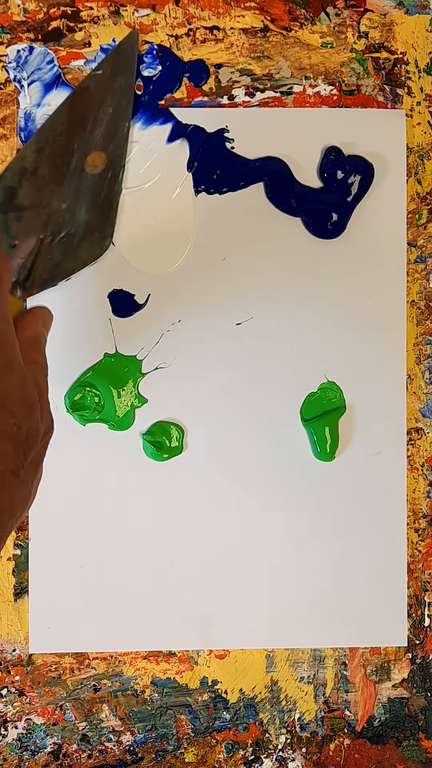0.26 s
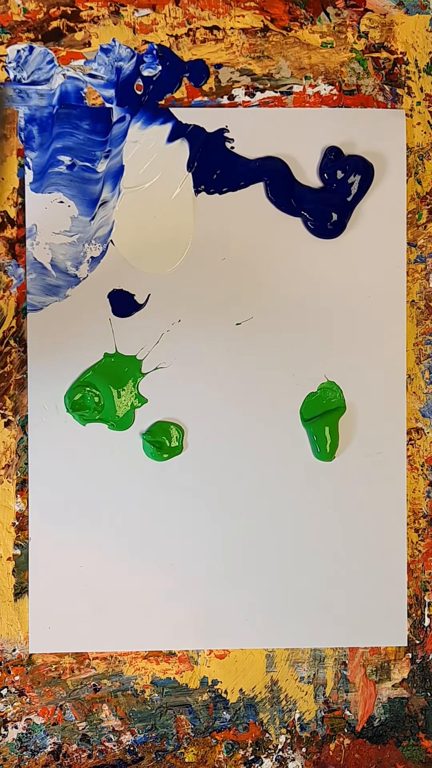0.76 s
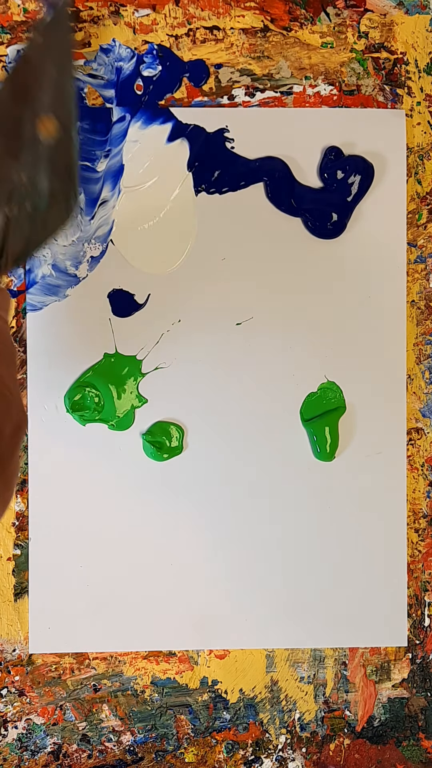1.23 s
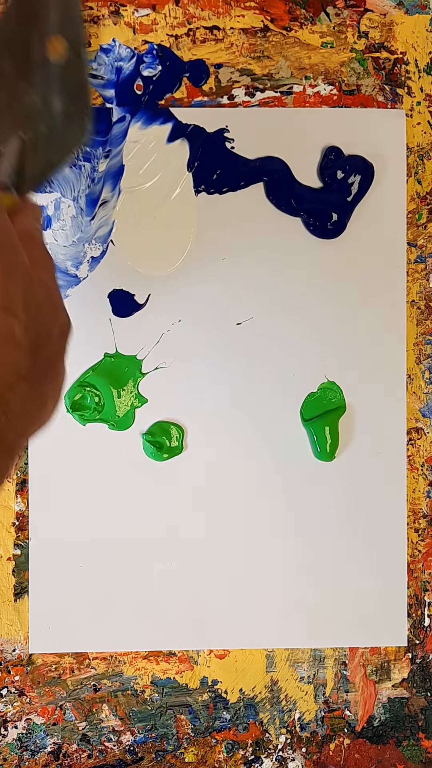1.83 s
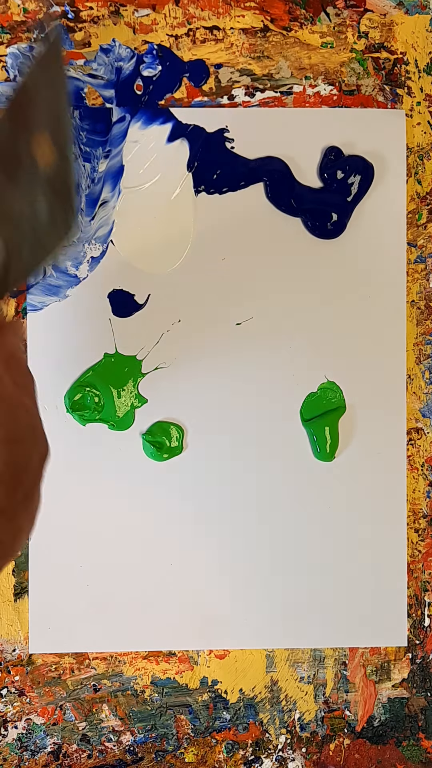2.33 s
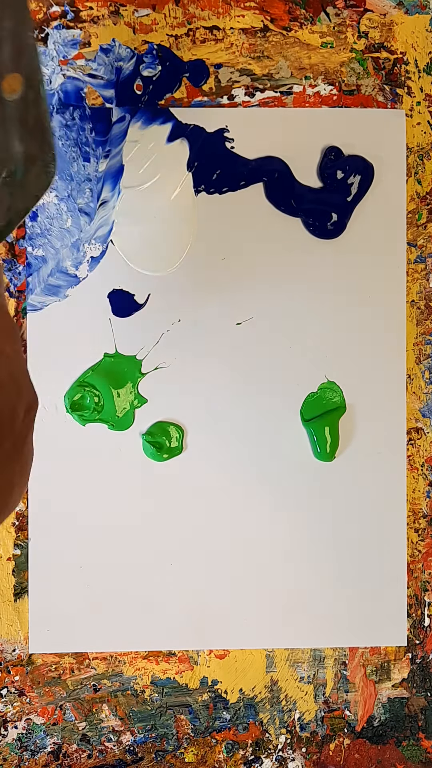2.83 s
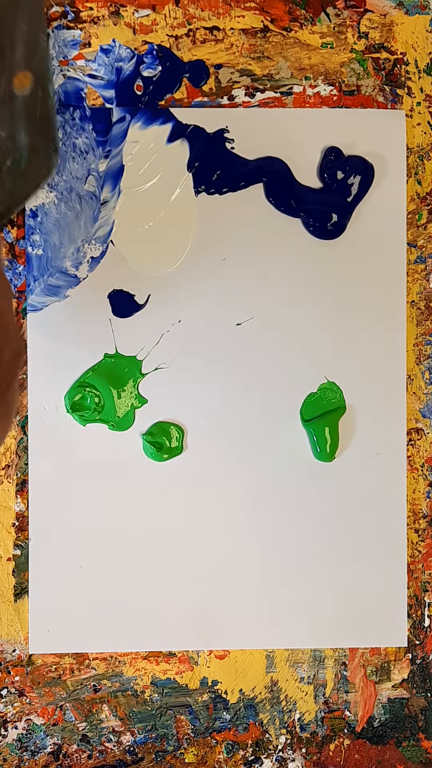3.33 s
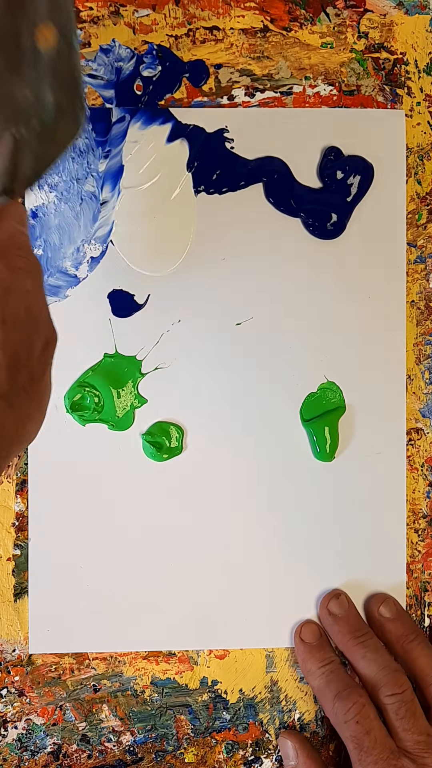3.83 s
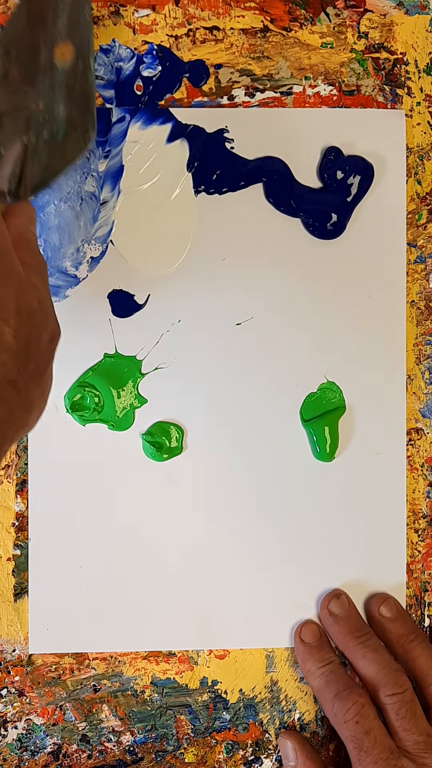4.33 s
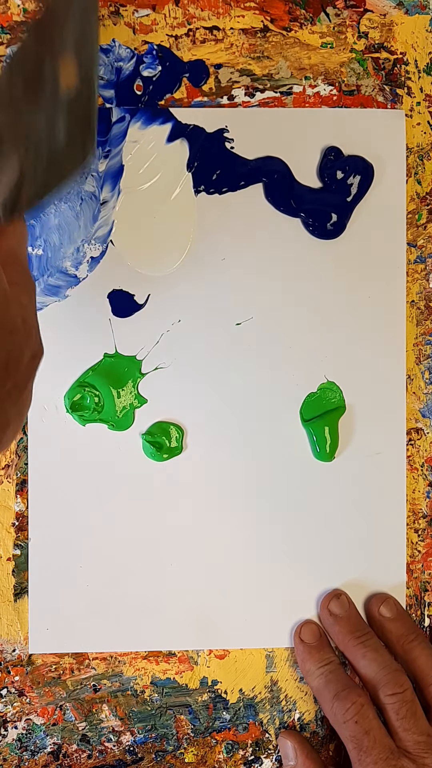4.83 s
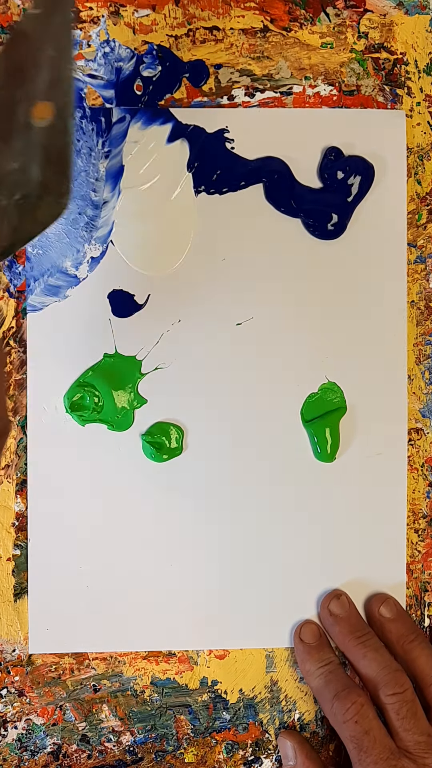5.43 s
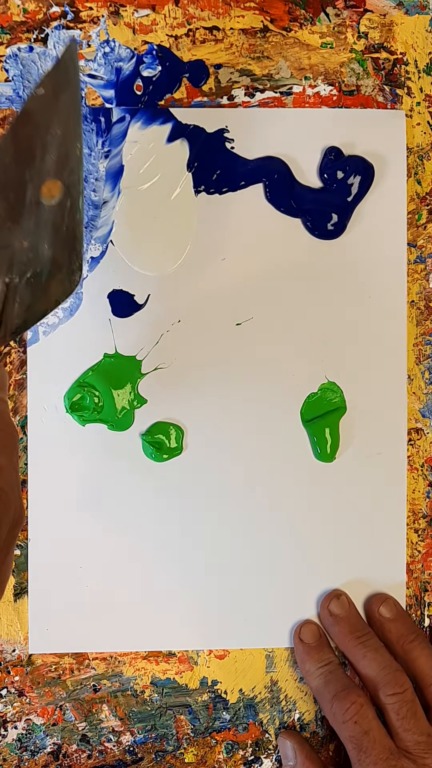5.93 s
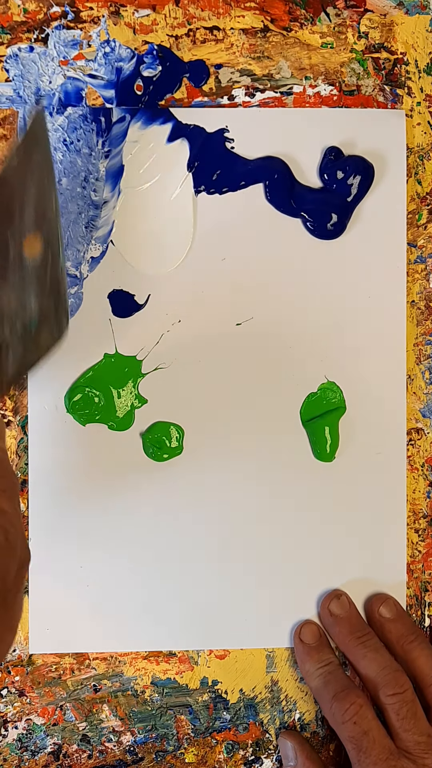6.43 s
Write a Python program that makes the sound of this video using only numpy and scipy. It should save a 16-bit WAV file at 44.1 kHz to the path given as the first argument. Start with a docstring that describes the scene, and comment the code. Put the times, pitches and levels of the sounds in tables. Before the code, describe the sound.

A quiet room with barely audible touches of a knife for about a second and a half. Then a flat steel painting knife slaps wet paint on paper over a wooden board, roughly three times a second, later quicker. Each blow is a hard clack with a hollow thud and short metallic ring, followed by faint sticky crackles as the blade lifts. Close stereo microphone, short room reflections.

```python
"""In a small live room, a steel painting knife dabs wet paint on a sheet of paper that lies on a wooden board.
After a few soft touches it slaps down three to five times a second: noisy blows clack, damped sines make the
board thud and the blade ring, and bursts of noise crackle as the tacky paint lets the blade go. Now and then a
lone thread of paint snaps with a tick or the edge scrapes, both made from shaped noise, over a faint room tone."""
import sys
import numpy as np
from scipy import signal
from scipy.fft import rfft, irfft, next_fast_len
from scipy.io import wavfile
from scipy.ndimage import map_coordinates

SR = 44100
rng = np.random.default_rng(int(sys.argv[2]) if len(sys.argv) > 2 else 0)


def dump_mix(stems):
    """Bounce the given channels to the path in sys.argv[1] as a 16-bit WAV at rate SR."""
    frames = np.atleast_2d(stems).T  # one column per channel
    limited = np.clip(frames, -1, 1)  # hard clip at full scale
    pcm = np.round(limited * 32767).astype(np.int16)
    wavfile.write(sys.argv[1], SR, pcm)


N = 294147

# room tone, relative spectrum: (frequency [Hz], level [dB])
AIR_SPECTRUM = [(18, -28.5), (30, -3.5), (98, -1.5), (210, -22), (295, -2), (461, -11), (649, -7.5),
                (866, -11.5), (1320, -7.5), (1630, -13), (2410, -14), (3060, -26), (16000, -35.5)]
# room tone over time: (time [s], level [dB])
AIR_LEVELS = [(0, -54.5), (0.2, -61), (0.7, -59), (1.05, -65), (1.451, -66), (3.602, -75), (6.598, -62.5)]
# how alike left and right are in diffuse sound: (frequency [Hz], likeness [0 to 1])
STEREO_LIKENESS = [(100, 1), (300, 0.47), (600, 0.082), (1100, 0.2), (2500, 0.019)]
# decay of the room's tail: (frequency [Hz], t60 [s])
ROOM_DECAY = [(100, 0.53), (400, 0.34), (1100, 0.3), (3000, 0.3), (7000, 0.31), (15000, 0.26)]
# the midrange is stronger on the knife's side: (frequency [Hz], left minus right [dB])
SIDE_TILT = [(450, -1.0), (1050, 5), (2200, 0.5), (4500, -0.5), (9000, 1.0)]

# knife meets paper, levels relative: (time [s], strength [dB], brightness [dB per octave], clack pitch [Hz],
# board thud [dB], board knock [dB], blade ring re strength [dB], tack of the paint [dB])
KNIFE_DABS = [(0.272, -39.5, -1.4, 1090, -48.5, -48.5, -0.5, -62),
              (0.297, -41.5, -1.5, 1120, -53, -48.5, -11, -58),
              (0.434, -41, -2, 870, -53.5, -46.5, -6, -63), (0.789, -41.5, -1, 865, -55, -48.5, -14, -45.5),
              (0.83, -45, 2.5, 860, -56, -47, -32, -72), (1.179, -44, -3, 980, -47.5, -45, -5, -43.5),
              (1.493, -11, -0.24, 1115, -22, -22.5, -2.5, -49),
              (1.791, -10, -4.5, 944, -20.5, -14.5, -15, -48),
              (2.11, -14, 3.5, 894, -33.5, -30.5, -2, -45.5),
              (2.408, -10, 1.16, 1000, -19.5, -21, -10, -37.5), (2.699, -9.5, 0.2, 977, -28, -18, -6, -32),
              (3.034, -15, 2.5, 940, -26.5, -21, -12, -28.5), (3.314, -15, 2, 1046, -30.5, -24, -7.5, -29),
              (3.497, -41, 9.5, 1150, -48.5, -51.5, -7.5, -62),
              (3.717, -10, -4, 1040, -20.5, -14.5, -16, -34.5),
              (3.936, -11.5, -1.5, 1150, -28, -22, -17, -34.5),
              (4.14, -11, -2.54, 1066, -22, -21.5, -27, -40.5), (4.314, -13, -4, 964, -21, -16, -21, -37.5),
              (4.509, -12, -2.2, 1015, -23.5, -21, -26, -30),
              (4.701, -14.5, 0.65, 944, -31.5, -20, -9, -34.5),
              (4.906, -12.5, -1.2, 1080, -30, -21, -2, -36),
              (5.122, -16, -0.5, 1040, -29.5, -26, -17, -32.5),
              (5.357, -13.5, -2.6, 1015, -29, -31, -26, -30), (5.609, -11, -1.5, 800, -25.5, -16, -4, -57),
              (5.865, -12.5, 1.54, 915, -33, -21, -27, -28), (6.093, -16.5, 6, 960, -28, -20, -8.5, -29),
              (6.307, -15, 4, 960, -22.5, -20, -4.5, -51), (6.513, -16, 6, 950, -27.5, -22, -4.5, -29.5)]
# the flat blade slapping the sheet, relative spectrum: (frequency [Hz], level [dB])
CLACK_SPECTRUM = [(30, -39.5), (120, -15.5), (340, 2), (560, 2), (800, 4.5), (1300, 3), (2700, -6),
                  (3300, -8.5), (3750, -9.5), (4300, -8), (5800, -12.5), (7500, -16.5), (10000, -18.5),
                  (12000, -17), (16000, -29)]
# lift of the clack above the dab's strength: (frequency [Hz], gain [dB])
CLACK_LIFT = [(700, 25.5), (1300, 26.5), (2500, 31.5), (4800, 29.0), (9500, 28)]
# drift of the clack's upper midrange as the mixing goes on: (time [s], gain [dB])
BITE_DRIFT = [(0, -3), (1.5, -4.5), (2.4, -2.5), (2.8, 3), (3.7, -2.5), (4.2, 3.5), (4.8, 4.5), (5.6, -1),
              (6.5, 0)]
# each landing stresses its own bands, this strongly: (frequency [Hz], depth [dB])
BAND_DEPTH = [(400, .3), (1400, 2.2), (2400, 2.8), (5000, 1.7)]
# the steel blade, damped by paint: (frequency [Hz], relative level [dB], t60 [s])
BLADE_MODES = [(1620, -6, .05), (2150, -2, .08), (2720, 2, .11), (2860, -1, .07), (3230, -6, .12),
               (4050, -8, .05), (4400, -6, .05), (5500, -5, .06), (5920, 2, .1), (6270, -4, .07),
               (7600, -9, .05), (9300, -12, .04), (10550, -11, .04), (12250, -9, .05)]
# lift of the blade's ring: (frequency [Hz], gain [dB])
RING_LIFT = [(2700, 16.9), (5500, 15.5), (9500, 5)]
# the board's deep and hollow modes before the hand stills them: (frequency [Hz], relative level [dB], t60 [s])
BOARD_MODES = [(59.4, -27, 1), (85.9, -8, 0.37), (120.6, -3.5, 0.44), (133.1, 0.5, 0.3),
               (172.2, -12.5, 0.47), (194.2, -13.5, 0.35), (258.2, -8.5, 0.29), (282.3, -1, 0.12),
               (299.5, -0.5, 0.24), (325.2, -4, 0.31), (373.4, -2, 0.22), (407, -4.5, 0.24),
               (445.4, -10, 0.23), (475, -6.5, 0.1), (587, -16.5, 0.32), (670.4, -8.5, 0.15),
               (864, -27, 0.23), (967.6, -13, 0.11), (1046, -3.5, 0.098)]

# paint threads parting, relative spectrum: (frequency [Hz], level [dB])
TACK_SPECTRUM = [(200, -34), (900, 2), (2300, 6.5), (6000, -0.5), (9000, -6), (13000, -3), (16000, -11)]
# further snaps of paint threads, heard as bright ticks: (time [s], relative level [dB])
THREAD_TICKS = [(0.6305, -39.5), (1.2793, -23), (3.4984, -26)]
# a bright tick, relative spectrum: (frequency [Hz], level [dB])
TICK_SPECTRUM = [(200, -25.5), (1100, -9.5), (2200, 1.5), (4000, -1), (6000, -3), (9000, -11),
                 (13000, -5.5), (16000, -12.5)]
# the blade's edge drags over the paper:
# (time [s], length [s], relative level [dB], lower resonance [Hz], upper resonance re lower [dB])
EDGE_SCRAPES = [(0.806, 0.087, -51, 2760, -20), (0.822, 0.034, -42.5, 2660, -36),
                (3.321, 0.094, -30, 2860, -6)]

TOP_HZ = 16000  # upper limit of the band
LENGTH = 24000  # samples in one event
T = np.arange(LENGTH) / SR
HZ = np.fft.rfftfreq(2 * LENGTH, 1 / SR)
CONTACT_S = 0.02  # t60 of the steel chattering on the paper
FAVOURED_HZ = 2520  # the point of contact brings out blade modes near this pitch
TILT_FROM_HZ, TILT_OCTAVES = 1360, 2.4  # the range that a cushion of paint dulls
BITE_HZ, BITE_OCTAVES = 3100, 1  # centre and reach of the upper midrange band
CLACK_OCTAVES = .28  # the slap's pitch is only a broad hump
UNEVEN_HZ = 220  # spacing of the stressed bands
BOARD_DAMPED_S = 0.24  # the hand's weight on the knife stills the board within about this time
# shares of the time to the next dab: the blade lifts, then the last thread of paint breaks
LIFT_SHARE, LAST_THREAD_SHARE = .36, .58
LIFT_SNAP_DB, LAST_THREAD_DB = 20.5, 9  # those two snaps, re the tack


def amp(db):
    """Decibels to gain."""
    return 10 ** (np.asarray(db) / 20)


def unit(x):
    """Scale to an energy of 1 per channel."""
    return x / np.sqrt(np.mean(np.sum(x ** 2, axis=-1)) + 1e-20)


def along(points, hz):
    """Read a curve of (frequency, value) points on a log frequency axis."""
    f, v = np.transpose(points)
    return np.interp(np.log(hz + 1), np.log(f), v)


def near(hz, centre_hz, octaves):
    """A bell from 0 to 1 around one pitch."""
    return np.exp(-(np.log2((hz + 1) / centre_hz) / octaves) ** 2)


def fade(t60):
    """An exponential decay that falls 60 dB in t60 seconds."""
    return np.exp(-np.log(1000) * T / np.maximum(t60, 1e-4))


def filtered(x, response):
    """Shape x with a response that is a function of frequency."""
    n = x.shape[-1]
    m = next_fast_len(n + SR // 10)
    hz = np.fft.rfftfreq(m, 1 / SR)
    return irfft(rfft(x, m) * response(hz), m)[..., :n]


def struck(x, spectrum_db):
    """Pass x through the causal, minimum-phase filter that has this spectrum."""
    cepstrum = irfft(np.log(amp(spectrum_db)))
    cepstrum[1:LENGTH] *= 2
    cepstrum[LENGTH + 1:] = 0
    response = np.exp(rfft(cepstrum))
    return irfft(rfft(x, 2 * LENGTH) * response)[:LENGTH]


def add(track, s, sound):
    """Mix a sound in at time s."""
    start = max(round(s * SR), 0)
    track[:, start:start + LENGTH] += sound[:, :max(N - start, 0)]


def diffuse(pair):
    """Two unrelated signals become a field that is alike in the bass."""
    def mid_side_gains(hz):
        turn = np.arccos(np.clip(along(STEREO_LIKENESS, hz), -1, 1)) / 2
        return np.array([np.cos(turn), np.sin(turn)])

    mid, side = filtered(pair, mid_side_gains)
    return np.array([mid + side, mid - side])


def room_tone():
    """Faint, dull air of the room: shaped diffuse noise whose level drifts."""
    air = filtered(diffuse(rng.standard_normal((2, N))), lambda hz: amp(along(AIR_SPECTRUM, hz)))
    level_db = np.interp(np.arange(N) / SR, *np.transpose(AIR_LEVELS))
    return air / air.std() * amp(level_db)


def in_room(x, radiated, wet_db, early_db=-8, early_t60=0.013, build=0.0015, lead=.00012):
    """x arrives straight from the left; radiated returns off the table top, then as the room's tail."""
    hz, t, noise = signal.stft(rng.standard_normal((2, LENGTH)), SR, nperseg=256)
    decay = np.exp(-np.log(1000) * t / along(ROOM_DECAY, hz)[:, None])
    tail = signal.istft(noise * decay, SR, nperseg=256)[1][:, :LENGTH]
    early = rng.standard_normal((2, LENGTH)) * fade(early_t60)
    rise = 1 - np.exp(-(T / build) ** 2)
    walls = diffuse(amp(wet_db) * unit(tail * rise) + amp(early_db) * unit(early * rise))
    # the right ear hears it later; the knife lands in a new place each time
    delay = lead * rng.uniform(0.15, 1.425) * np.array([[0], [1]])
    direct = filtered(np.array([x, x]), lambda f: np.exp(-2j * np.pi * f * delay))
    both = direct + signal.fftconvolve(radiated[None], walls, axes=1)[:, :LENGTH]
    return filtered(both, lambda f: amp(np.array([[1], [-1]]) * along(SIDE_TILT, f) / 2))


def travelled(x, seconds=0.000842):
    """Bending waves carry treble faster than bass, which spreads a blow over a few milliseconds."""
    # seconds sets the dispersion, referred to 1 kHz
    return filtered(x, lambda hz: np.exp(-4j * np.pi * seconds * np.sqrt(1000 * hz)))


def blow(contact, chatter=0.97, rebound_db=-12, rebound_s=0.0094, rough_hz=1500):
    """Force of one dab: a push cushioned by paint, then chatter of steel on paper and a small rebound."""
    first, second = unit(rng.standard_normal((2, LENGTH)) * fade(contact))
    rebound_at = round(rebound_s * rng.uniform(0.79, 2.2) * SR)
    rattle = chatter * first + amp(rebound_db) * np.roll(second, rebound_at)
    push = signal.lfilter(*signal.butter(1, 2200, fs=SR), 1.0 * (T == 0))
    rough = signal.lfilter(*signal.butter(1, rough_hz, "high", fs=SR), rattle)
    return travelled(push + rough)


def uneven():
    """Random peaks and dips (dB) in the colour of one dab."""
    knots = rng.standard_normal(int(SR / 2 / UNEVEN_HZ) + 2)
    return along(BAND_DEPTH, HZ) * map_coordinates(knots, [HZ / UNEVEN_HZ])


def ring(modes, scatter_db, detune, phase_spread):
    """One damped sine per mode; each contact point gives new strengths and slightly new pitches."""
    hz, db, t60 = np.transpose(modes)[:, :, None]
    size, shift, phase = rng.standard_normal((3, len(modes), 1))
    sines = np.sin(2 * np.pi * hz * (1 + detune * shift) * T + phase_spread * phase)
    return amp(db + scatter_db * size) * fade(t60) * sines


def blade(favoured_hz):
    """The blade's ring; the point of contact brings out the modes near one pitch."""
    modes = ring(BLADE_MODES, scatter_db=2.5, detune=.008, phase_spread=2)
    boost_db = 7 * near(np.array(BLADE_MODES)[:, 0], favoured_hz, octaves=.12)
    return unit(amp(boost_db) @ modes)


def board(thud_db, knock_db, split_hz=210, swell=0.0015):
    """The board swings up within a few milliseconds: deep modes thud, higher ones knock."""
    modes = ring(BOARD_MODES, scatter_db=2.5, detune=.006, phase_spread=.4)
    modes = modes * (1 - np.exp(-T / swell)) * np.exp(-(T / BOARD_DAMPED_S) ** 4)
    deep = np.array(BOARD_MODES)[:, 0] < split_hz
    thud = amp(thud_db + 33.0) * unit(modes[deep].sum(0))
    knock = amp(knock_db + 31) * unit(modes[~deep].sum(0))
    return thud + knock


def dabs(pitch_db=8, overtone_db=4):
    """The blade clacks, rings and shakes the board; less paint under it makes the clack brighter."""
    out = np.zeros((2, N))
    octaves = np.clip(np.log2((HZ + 1) / TILT_FROM_HZ), 0, TILT_OCTAVES)
    for s, db, brightness, clack_hz, thud_db, knock_db, ring_db, _ in KNIFE_DABS:
        tilt = brightness * octaves
        bite = np.interp(s, *np.transpose(BITE_DRIFT)) * near(HZ, BITE_HZ, BITE_OCTAVES)
        # the low end of the clack follows the board's knock
        colour = [(300, knock_db + 42.0)] + [(hz, db + gain) for hz, gain in CLACK_LIFT]
        hump = pitch_db * near(HZ, clack_hz, CLACK_OCTAVES)
        overtone = overtone_db * near(HZ, 2 * clack_hz, octaves=0.051)
        spectrum = along(CLACK_SPECTRUM, HZ) + along(colour, HZ) + hump + overtone + tilt + bite + uneven()
        clack = struck(blow(CONTACT_S), spectrum)
        all_around = struck(T == 0, spectrum)  # over all directions the chatter averages out
        steel = struck(blade(FAVOURED_HZ), along(RING_LIFT, HZ) + db + ring_db + tilt)
        add(out, s, in_room(clack + steel, all_around + steel, wet_db=-1.5))
        add(out, s, board(thud_db, knock_db) * amp([[.3], [-.3]]))  # a touch to the left
        # the paint is touched just before the paper
        add(out, s - .003, amp(-33) * np.array([clack, clack]))
    return out


def threads(db, centre, spread=0.037, swarm_db=23.5):
    """Dozens of paint threads part in a swell around the centre time."""
    breaking = rng.random(LENGTH) < 1400 / SR  # threads a second, before the swell thins them
    sizes = rng.standard_normal(LENGTH) * amp(4 * rng.standard_normal(LENGTH))
    swell = np.exp(-((T - centre) / spread) ** 2 / 2)
    return amp(db + swarm_db) * unit(breaking * sizes * swell)


def snap(db):
    """A very short dry burst of noise."""
    return amp(db) * unit(rng.standard_normal(LENGTH) * fade(.007))


def peels():
    """After every dab the paint crackles and snaps as the blade lifts; a quicker stroke lifts sooner."""
    out = np.zeros((2, N))
    strokes = np.diff([row[0] for row in KNIFE_DABS])
    strokes = np.append(strokes, strokes[-1])
    for (s, *_, tack_db), stroke in zip(KNIFE_DABS, strokes):
        lift, last = LIFT_SHARE * stroke, LAST_THREAD_SHARE * stroke
        pops = threads(tack_db, lift)
        pops = pops + np.roll(snap(tack_db + LIFT_SNAP_DB), round(lift * SR))
        pops = pops + np.roll(snap(tack_db + LAST_THREAD_DB), round(last * SR))
        crackle = struck(pops, along(TACK_SPECTRUM, HZ))
        add(out, s, in_room(crackle, crackle, wet_db=-7))
    return out


def ticks():
    """Light, bright ticks of lone paint threads snapping: short bursts of noise with their own colour."""
    out = np.zeros((2, N))
    for s, db in THREAD_TICKS:
        spectrum = along(TICK_SPECTRUM, HZ) + db + 18
        add(out, s, in_room(struck(snap(0), spectrum), struck(T == 0, spectrum), wet_db=-1.0))
    return out


def scrapes(width_hz=200, ratio=1.43):
    """Tiny slips of the edge on the paper's grain keep two bending modes of the blade sounding."""
    out = np.zeros((2, N))
    for s, length, db, hz, upper_db in EDGE_SCRAPES:
        slips = (rng.random(LENGTH) < 2000 / SR) * rng.standard_normal(LENGTH)  # 2000 slips a second
        stroke = np.clip(1 - T / length, 0, 1) * np.minimum(T / .004, 1)
        lower = np.sin(2 * np.pi * hz * T)
        upper = amp(upper_db) * np.sin(2 * np.pi * ratio * hz * T)
        modes = (lower + upper) * np.exp(-np.pi * width_hz * T)
        rasp = unit(signal.fftconvolve(slips * stroke, modes)[:LENGTH])
        rasp = amp(db) * rasp * np.sqrt(length * SR / 2)  # a longer scrape holds more energy
        add(out, s, in_room(rasp, rasp, wet_db=-7.0))
    return out


def scene():
    """The quiet room, blows, peeling paint, ticks and scrapes."""
    return room_tone() + dabs() + peels() + ticks() + scrapes()


def record(dry):
    """Cut the sub-bass, round off the highest peaks and end the band steeply at its upper limit."""
    lean = signal.sosfilt(signal.butter(4, 52, "high", fs=SR, output="sos"), dry)
    rounded = lean / (1 + lean ** 6) ** (1 / 6)
    return filtered(rounded, lambda hz: 1 / (1 + (hz / TOP_HZ) ** 120))


dry = scene()
out = record(dry)
dump_mix(out)
```